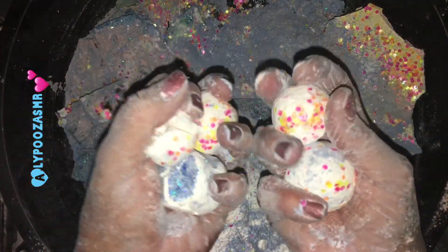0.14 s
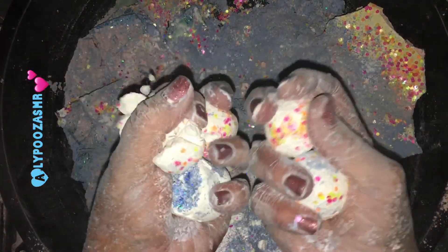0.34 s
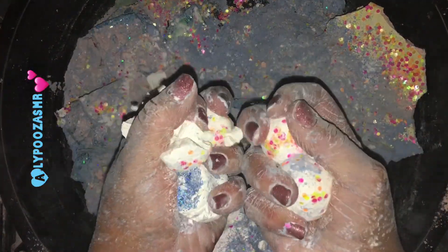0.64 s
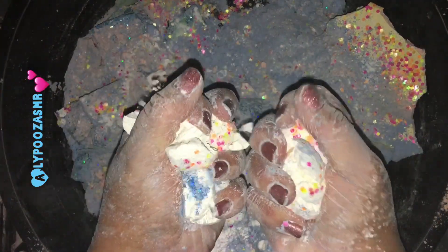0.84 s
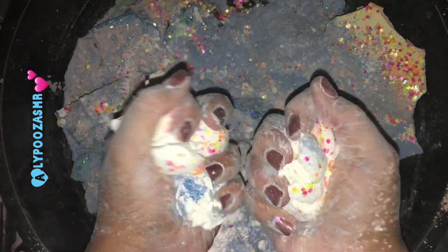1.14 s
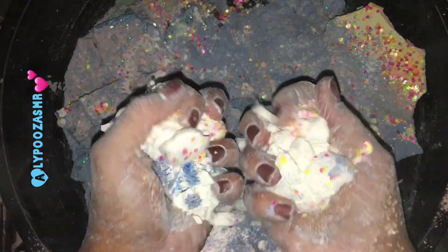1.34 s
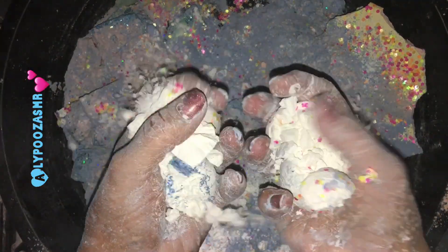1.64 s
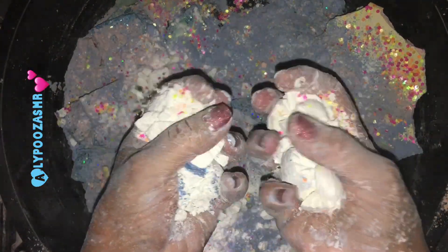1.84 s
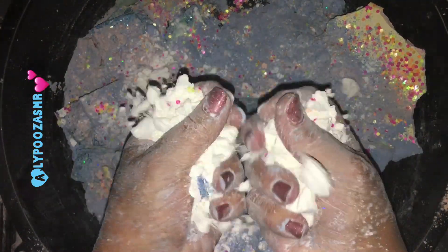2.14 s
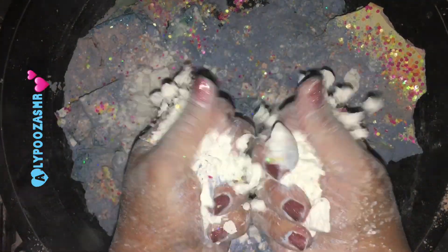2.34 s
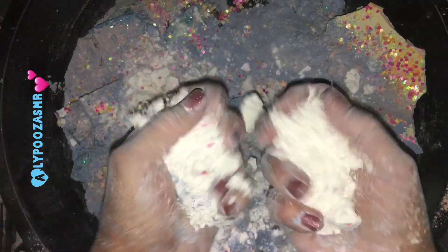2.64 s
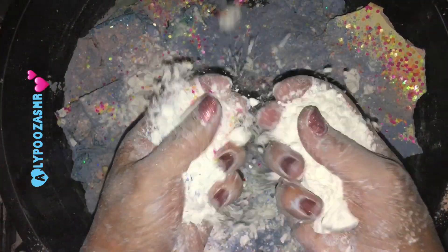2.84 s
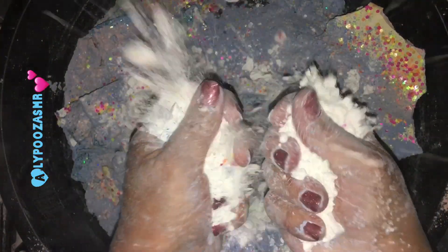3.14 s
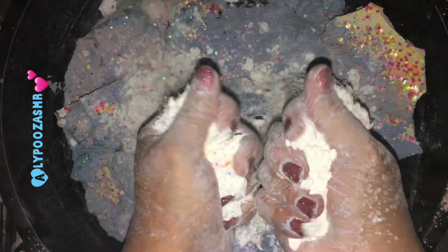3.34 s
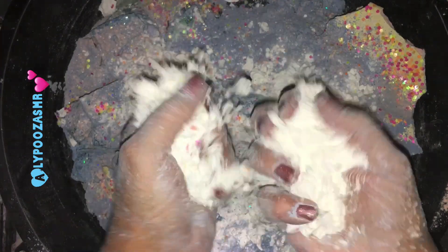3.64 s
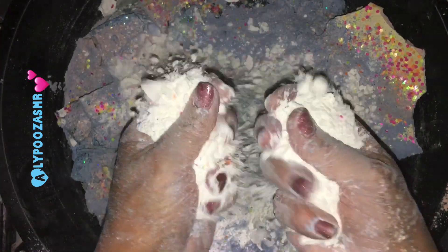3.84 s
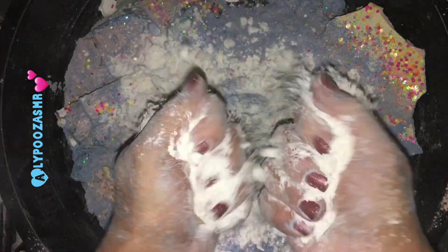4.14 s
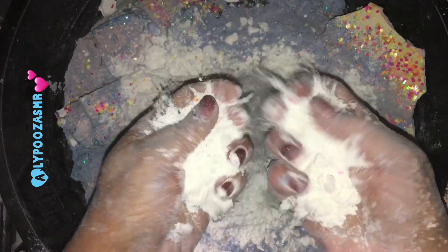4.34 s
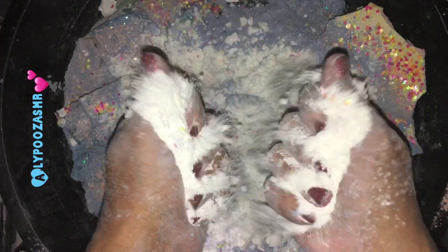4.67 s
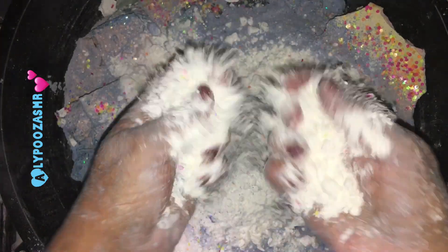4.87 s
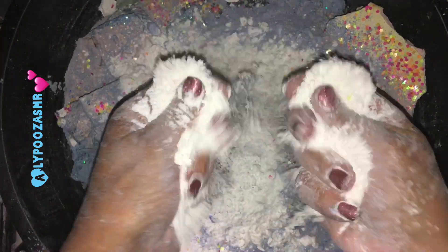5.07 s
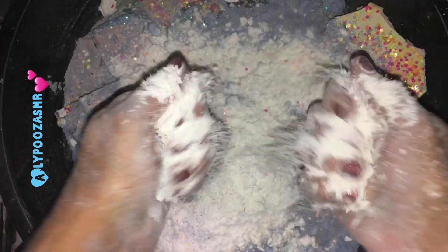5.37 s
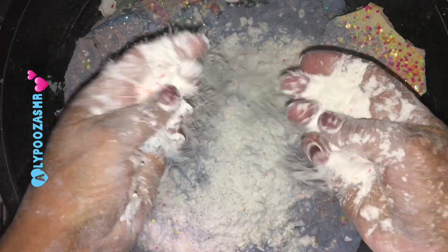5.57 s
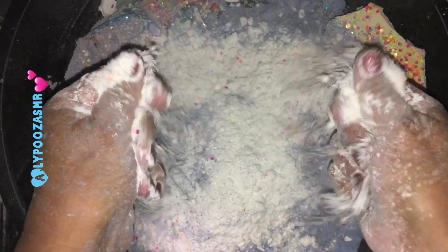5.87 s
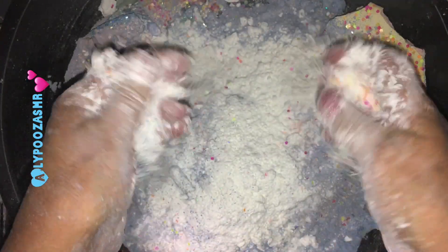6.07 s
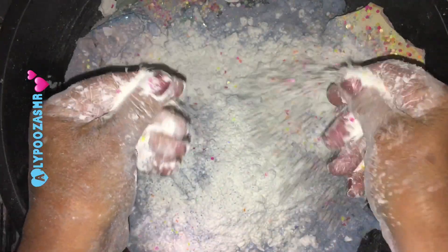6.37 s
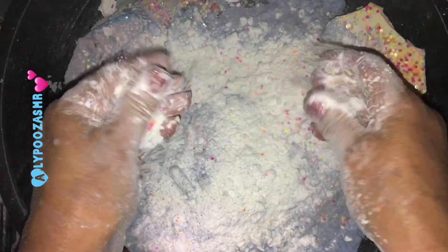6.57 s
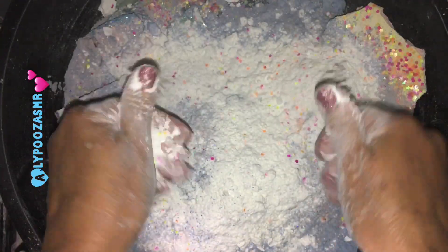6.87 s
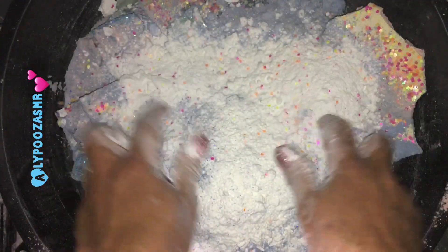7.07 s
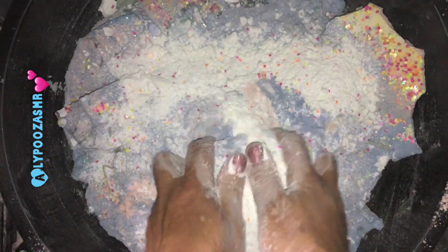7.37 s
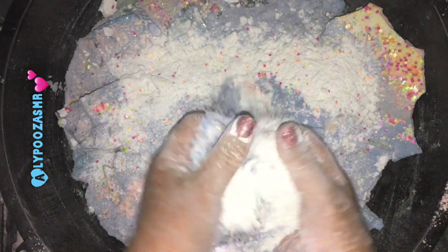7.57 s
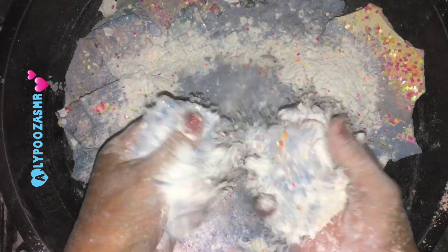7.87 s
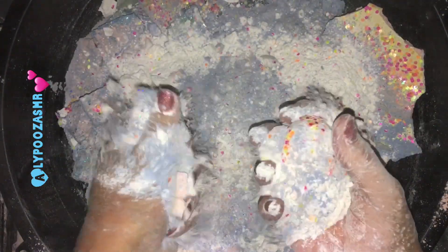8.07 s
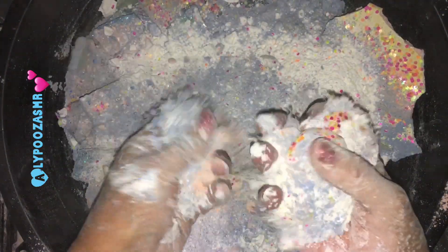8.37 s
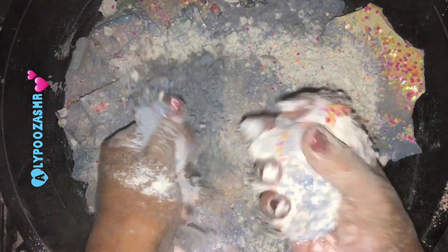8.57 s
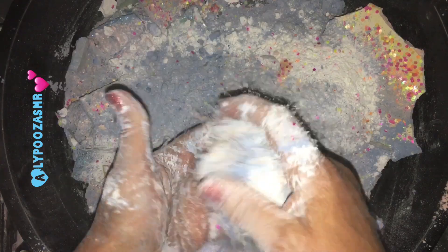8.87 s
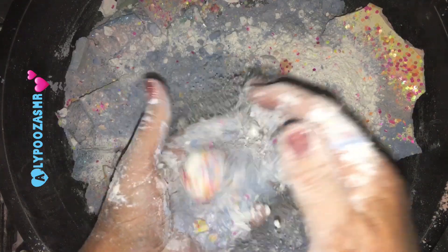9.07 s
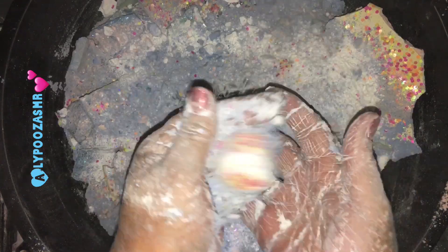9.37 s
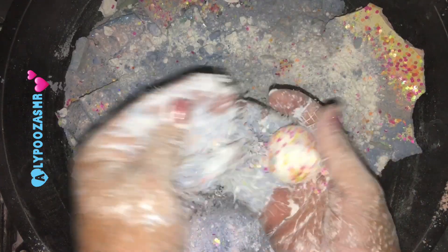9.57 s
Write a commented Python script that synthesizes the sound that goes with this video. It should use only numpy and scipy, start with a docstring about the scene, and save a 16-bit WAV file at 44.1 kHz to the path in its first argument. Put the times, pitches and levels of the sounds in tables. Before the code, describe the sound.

Very close crushing of chalk and starch pieces: crisp crunches, a hard crack near three seconds, hissing fine powder, then palms brushing through it.

```python
"""Crushing chalk and cornstarch

Two hands crush lumps over a bed of powder, close to the microphone, with a short faint room tail.
Squeezed powder hisses and grinds as coloured noise in flurries; damped resonances make the snaps and thuds.
Crusts crunch in short noise bursts, and after seven seconds the palms sweep dully through the bed.
A steady low rumble and a faint, mostly low air noise lie underneath."""
import sys
import numpy as np
from scipy import signal
from scipy.fft import rfft, irfft, next_fast_len
from scipy.io import wavfile
from scipy.ndimage import map_coordinates

SR = 44100
rng = np.random.default_rng(int(sys.argv[2]) if len(sys.argv) > 2 else 0)


def to_wav(sig):
    """Store sig (one row per channel, or 1-D mono) as 16-bit WAV at the path in sys.argv[1].

    Samples outside -1..1 are clipped; the rate is SR.
    """
    pcm = np.clip(np.atleast_2d(sig), -1, 1) * 32767
    pcm = np.round(pcm).astype(np.int16)
    wavfile.write(sys.argv[1], SR, pcm.T)  # frames by channels


N = 428191  # samples
EVENT_SIZE = int(.05 * SR)  # samples given to each snap, crunch or thud

# Background noise colours. Each row: frequency in Hz, relative level in dB per Hz.
RUMBLE_COLOUR = [(14, -20), (22, -13), (31, -16), (34, -7), (37, 0), (41, 0), (45, -7), (49, -20),
                 (60, -11), (80, -20)]
AIR_COLOUR = [(55, 6.5), (100, 3), (170, -5.5), (260, -10.5), (400, -24), (1500, -59), (12000, -43)]
RUMBLE_DB, AIR_DB = -45, -54.5
# Tail of the tub and nearby walls: decay by 60 dB in seconds, level against the direct sound in dB.
ROOM_T60_S, ROOM_DB = 0.078, -22
# Hollows of the cupped hands and the tub. Each row: frequency in Hz, width in Hz, gain in dB.
HOLLOWS = [(781, 130, -0.5), (1313, 150, 0), (2200, 74, -14.5)]

# Colours of the material at hand. Each row: frequency in Hz, relative level in dB per Hz.
PALM_COLOUR = [(90, 2), (170, 4.5), (350, -1), (550, -2.5), (780, -3), (1050, -8), (1500, -8.5),
               (2400, -16), (4000, -28)]
CRUST_COLOUR = [(400, -1.5), (1200, -7.5), (2500, 5.5), (5000, -5), (8500, 0), (10500, -8.5),
                (13000, -15.5), (16000, -28)]
CRUMB_COLOUR = [(70, -2), (130, 1), (200, 2.5), (330, -3), (550, -2.5), (780, -9), (1000, -10),
                (1400, -11.5), (2000, -11.5), (3500, -49)]
GRIT_COLOUR = [(700, -49), (1100, -1.5), (1450, -8.5), (1800, -9), (2300, -1), (3100, -0.5), (3900, -1),
               (4700, -5), (6500, -6), (10000, -34)]
POWDER_COLOUR = [(2500, -39.5), (4000, -6), (5100, -5.5), (6000, -1), (7000, -0.5), (8600, 1.5),
                 (10000, -3), (12000, -12), (14000, -19), (16000, -24)]

# Palms sweeping through the bed.
SWEEP_START_S, SWEEP_PEAK_S, SWEEP_ATTACK_S = 7.04, 7.3, 0.05
SWEEP_DB, SWEEP_RISE_DB_PER_S, SWEEP_FALL_DB_PER_S = -47, 10, 39
# Lumps landing or giving way. Each row: start in seconds, level in dB, pitch in Hz.
THUDS = [(0.5325, -35.5, 180), (0.5382, -39, 178), (0.5439, -36, 176), (1.509, -36.5, 178),
         (2.313, -44, 272), (2.668, -34, 465), (2.7323, -41.5, 157), (2.9045, -44, 173),
         (2.9513, -41.5, 477), (3.053, -40, 322), (3.2328, -24, 363), (3.2398, -25.5, 503),
         (3.2432, -21, 267), (3.2452, -27, 620), (3.283, -32, 730), (3.5826, -48.5, 360),
         (3.7845, -40.5, 221), (3.9625, -44, 187), (4.285, -41, 660), (4.9737, -46, 223), (5.741, -48, 524),
         (6.1859, -44.5, 228), (8.0521, -47, 470), (8.1155, -44, 205), (8.2122, -30.5, 235),
         (8.26, -49, 254)]
# Thud bandwidth as a share of its pitch; patter of crumbs in dB against the push, and its decay in seconds.
THUD_WIDTH, PATTER_DB, PATTER_S = 0.31, -39.5, 0.018
# Crusts collapsing. Each row: start in seconds, level in dB, centre in Hz, decay in seconds.
CRUNCHES = [(0.135, -49, 7950, 0.0021), (0.16, -48, 7610, 0.0027), (0.467, -42.5, 4800, 0.0039),
            (1.13, -37.5, 5660, 0.0056), (1.2208, -48, 8850, 0.0012), (1.365, -45.5, 8100, 0.0077),
            (1.685, -49, 7930, 0.0022), (1.904, -44.5, 6200, 0.0031), (1.996, -41, 7620, 0.0042),
            (2.008, -40, 7540, 0.0021), (2.653, -51, 5700, 0.0064), (2.909, -36, 7850, 0.0023),
            (3.0558, -31.5, 5970, 0.0028), (3.112, -44, 4130, 0.00092), (3.242, -33.5, 4270, 0.0045),
            (3.276, -40, 4220, 0.0033), (3.337, -36.5, 3900, 0.0011), (4.2448, -36.5, 6700, 0.001),
            (6.0741, -48.5, 8600, 0.00085), (7.008, -47.5, 9000, 0.0012), (8.255, -46.5, 4800, 0.0019),
            (8.763, -47, 7160, 0.00084)]
# Hard pieces snapping. Each row: start in seconds, ring level in dB, pitch in Hz, splinter tick level in dB.
CRACKS = [(0.7306, -45.5, 3450, -67), (0.9592, -54, 1890, -55), (1.4683, -47, 1800, -59),
          (1.5, -46, 1310, -61), (1.507, -40.5, 1610, -45.5), (1.55, -26.3, 1570, -34.5),
          (1.5714, -45, 1580, -49), (1.6073, -47, 1790, -65), (2.235, -48.5, 2410, -65),
          (2.314, -49, 2520, -68), (2.3821, -42, 1260, -56), (2.3996, -46.5, 1980, -61),
          (2.4299, -50, 1360, -44), (2.6681, -40, 1770, -61), (2.7544, -45.5, 2080, -50),
          (2.787, -43.5, 1480, -52), (2.8278, -39.5, 1570, -60), (2.9575, -40.5, 1280, -66),
          (3.0425, -41.5, 3140, -38), (3.2317, -26.5, 1150, -33.5), (3.238, -23, 1100, -35),
          (3.241, -23.5, 1130, -56), (3.2535, -40, 1240, -44), (3.2664, -38, 3000, -36.5),
          (3.283, -36, 1170, -43), (3.5837, -50.5, 1920, -61), (3.695, -43.5, 2280, -44),
          (3.7799, -45.5, 3300, -48), (3.7843, -34.5, 2310, -41), (4.2448, -49, 2600, -50),
          (4.7378, -48.5, 1410, -55), (4.921, -51.5, 1400, -58), (4.973, -47, 2000, -48.5),
          (5.0092, -46, 1400, -54), (6.1478, -53, 1190, -60), (6.184, -45, 2930, -49),
          (6.889, -31, 2020, -50), (6.8896, -32, 3700, -47), (6.8952, -44, 1980, -50),
          (7.0153, -51.5, 3130, -44.5), (7.0674, -48.5, 2180, -51), (7.7765, -60, 3180, -50.5),
          (8.086, -41.5, 1480, -60), (8.1149, -38.5, 2860, -72), (8.2133, -36, 830, -55),
          (9.2048, -46, 1090, -49)]
# Small chips breaking off: average rate, level and spread in dB against the grit and crumbs, pitch range.
CHIPS_PER_S, CHIP_DB, CHIP_SPREAD_DB = 4.2, -4.5, 4
CHIP_LOW_HZ, CHIP_HIGH_HZ = 1280, 3100
# Powder trickling from the hands between squeezes. Each row: time in seconds, then drive in dB
# for fine powder, coarse grit and crumbs on the bed.
TRICKLE = [(0.31, -60.5, -61.0, -69), (0.89, -52.5, -56.0, -61), (1.05, -56, -57, -64.0),
           (1.332, -52.0, -55.0, -58.5), (1.79, -55.0, -58, -59), (2.1, -46.5, -53.5, -55.0),
           (2.97, -50.5, -48.0, -50.0), (3.6, -49.5, -55.0, -54), (4.069, -49.5, -52.0, -49.0),
           (4.35, -50.5, -57, -54), (4.89, -56, -64, -58.5), (5.11, -48, -48.0, -52.0),
           (5.479, -53, -66.5, -65.0), (6.55, -52.5, -67.0, -62.5), (7.64, -61.5, -61.5, -64.5),
           (7.999, -54, -59, -56), (8.651, -51, -58.0, -60.0), (9.39, -58.5, -61.5, -63.5)]
# Fingers closing, holding and letting go. Each row: start in seconds, length in seconds, then drive in dB
# for fine powder, coarse grit and crumbs on the bed.
SQUEEZES = [(0.0, 0.044, -41, -46.5, -54.5), (0.068, 0.118, -48, -58.5, -70),
            (0.235, 0.025, -50, -60.5, -64.5), (0.354, 0.052, -50, -54.5, -67.0),
            (0.465, 0.07, -51.5, -46, -61), (0.511, 0.03, -51, -46, -41.5),
            (0.609, 0.091, -43, -44.5, -60.0), (0.762, 0.058, -51, -49.0, -60.5),
            (0.922, 0.042, -51, -46.0, -57), (1.103, 0.046, -43.0, -41.5, -55),
            (1.182, 0.093, -50.0, -56.5, -65), (1.45, 0.197, -57, -49.5, -47.0),
            (1.722, 0.04, -66, -56.5, -52), (1.824, 0.103, -52, -50.5, -64.5),
            (1.939, 0.063, -43, -46.5, -54.5), (2.157, 0.175, -50.5, -48, -48),
            (2.353, 0.093, -48.5, -52, -47.5), (2.516, 0.046, -41.5, -56.0, -56.0),
            (2.607, 0.054, -45.5, -46.5, -52.5), (2.768, 0.161, -45.5, -43, -43.0),
            (3.008, 0.064, -48, -44.5, -49.0), (3.182, 0.191, -44, -48, -47.0),
            (3.413, 0.078, -50, -49, -58.5), (3.656, 0.145, -53, -46.5, -47.0),
            (3.743, 0.144, -49.5, -46.5, -46.0), (3.885, 0.165, -49.5, -51, -51.0),
            (4.097, 0.099, -43, -52.5, -54.5), (4.397, 0.277, -51, -51, -51.5),
            (4.666, 0.104, -46, -52, -54.0), (4.784, 0.068, -47, -53.5, -62.5),
            (4.909, 0.121, -49.5, -52.5, -50.0), (5.158, 0.109, -44.5, -53.0, -49.5),
            (5.316, 0.099, -46, -55.5, -56.0), (5.495, 0.157, -51, -54, -55.5),
            (5.639, 0.194, -48.5, -50, -56.5), (5.809, 0.123, -42, -53.5, -56.5),
            (5.917, 0.128, -49.5, -64.5, -64.0), (6.135, 0.168, -45.5, -51, -58.0),
            (6.31, 0.15, -46, -58.5, -65), (6.595, 0.115, -40.5, -57, -60.0),
            (6.726, 0.061, -41.5, -57.5, -66.0), (6.797, 0.099, -48.5, -61.5, -71.5),
            (6.993, 0.084, -52, -56.5, -54), (7.148, 0.066, -60, -53, -56), (7.36, 0.081, -67, -60, -51.5),
            (7.731, 0.142, -54.5, -58.5, -53), (7.939, 0.12, -54.0, -58, -55.5),
            (8.053, 0.048, -47.5, -48.5, -40.5), (8.189, 0.08, -53, -56.5, -40),
            (8.386, 0.216, -56, -61.5, -55.5), (8.73, 0.055, -59, -59, -52.5),
            (9.045, 0.048, -68, -59.0, -52.5), (9.146, 0.042, -42, -50.0, -44.0),
            (9.547, 0.15, -46, -65.5, -68.5)]
SQUEEZE_ATTACK_S, SQUEEZE_RELEASE_S = 0.03, 0.033

CUTOFF_HZ = 15900  # top of the recorded range


def from_db(db):
    """Decibels to gain."""
    return 10 ** (np.asarray(db) / 20)


def rms_one(x):
    """Scale to an rms of 1."""
    return x / np.sqrt(np.mean(x ** 2) + 1e-20)


def add(track, s, sound):
    """Mix a sound into the track from time s on."""
    start = int(np.clip(round(s * SR), 0, N - 1))
    track[start:start + len(sound)] += sound[:N - start]


def colour(x, spectrum):
    """Give a noise a spectrum of (Hz, dB) points, with skirts falling away outside them; rms 1."""
    size = next_fast_len(len(x))
    hz, db = np.transpose(spectrum)
    bins = np.maximum(np.arange(size // 2 + 1) * SR / size, 1)
    skirt = np.minimum(bins / hz[0], 1) ** 2 * np.minimum(hz[-1] / bins, 1) ** 2
    gain = skirt * from_db(np.interp(np.log(bins), np.log(hz), db))
    return rms_one(irfft(rfft(x, size) * gain, size)[:len(x)])


def cut(x, hz, kind, order=2):
    """Butterworth low- or high-pass."""
    sos = signal.butter(order, np.clip(hz, 10, .45 * SR), kind, fs=SR, output="sos")
    return signal.sosfilt(sos, x)


def resonate(x, hz, width_hz):
    """One resonance, gain 1 on top."""
    r = np.exp(-np.pi * width_hz / SR)
    zeros = np.array([1, 0, -1]) * (1 - r * r) / 2
    poles = [1, -2 * r * np.cos(2 * np.pi * hz / SR), r * r]
    return signal.lfilter(zeros, poles, x + 1e-18)


def drift(rate):
    """Smooth random wander of rms 1, changing about rate times a second."""
    # made at a twentieth of the sample rate; the first 2000 values let the filter settle
    r = np.exp(-40 * np.pi * rate / SR)
    slow = signal.lfilter([1], [1, -2 * r, r * r], rng.standard_normal(N // 20 + 2002))[2000:]
    return np.interp(np.arange(N) / 20, np.arange(len(slow)), rms_one(slow))


def grains(size, spread_db):
    """Countless tiny fractures of very uneven strength, as noise."""
    strength = from_db(spread_db * np.clip(rng.standard_normal(size), -2, 2))
    return rng.standard_normal(size) * strength


def clicks(per_s, spread_db):
    """Lone fractures at random moments, mostly small and a few large."""
    sizes = from_db(spread_db * np.minimum(rng.exponential(1, N), 3.5))
    return sizes * (rng.random(N) < per_s / SR)


def avalanches(per_s, spread_db, decay_s):
    """Each slip sets off a flurry that starts at once and dies away; an envelope of rms 1."""
    keep = np.exp(-2 / (decay_s * SR))  # the flurries add up in power
    power = signal.lfilter([1], [1, -keep], clicks(per_s, spread_db) ** 2 + 1e-18)
    return rms_one(np.sqrt(power))


def impact(scatter, scatter_s):
    """One sharp release with a short, decaying scatter of fragments."""
    t = np.arange(EVENT_SIZE) / SR
    return (t == 0) + scatter * rng.standard_normal(EVENT_SIZE) * np.exp(-t / scatter_s)


def rumble():
    """Steady noise in the lowest octaves, strongest around 40 Hz."""
    return from_db(RUMBLE_DB) * colour(rng.standard_normal(N), RUMBLE_COLOUR)


def air():
    """Steady, faint noise that is mostly low."""
    return from_db(AIR_DB) * colour(rng.standard_normal(N), AIR_COLOUR)


def room(x):
    """A short, dulled noise tail from the tub and nearby walls, arriving 3 ms after the direct sound."""
    t = np.arange(SR // 3) / SR
    dulled = cut(rng.standard_normal(len(t)), 8600, "low", order=1)
    tail = dulled * from_db(-60 * t / ROOM_T60_S) * (t > .003)
    return signal.fftconvolve(x, tail / np.linalg.norm(tail))[:N]


def hollows(x):
    """The hollows of hands and tub ring along with whatever breaks near them."""
    return x + sum(from_db(db) * resonate(x, hz, width_hz) for hz, width_hz, db in HOLLOWS)


def between_palms(x):
    """A weak reflection off the moving palms combs the sound, so that its colour keeps shifting."""
    lag = .0006 * SR * from_db(2.2 * drift(rate=2.5))  # around 0.6 ms, in samples
    return x + .24 * map_coordinates(x, [np.arange(N) - lag], order=3)


def sweeping():
    """Flat hands push through loose powder with a dull, uneven rub that swells and fades."""
    t = np.arange(N) / SR
    touch = np.clip((t - SWEEP_START_S) / SWEEP_ATTACK_S, 0, 1)
    rise_db = SWEEP_RISE_DB_PER_S * (t - SWEEP_PEAK_S)
    fall_db = SWEEP_FALL_DB_PER_S * (SWEEP_PEAK_S - t)
    level_db = SWEEP_DB + np.minimum(rise_db, fall_db) + 1.6 * drift(rate=35)
    return touch * from_db(level_db) * colour(grains(N, spread_db=6), PALM_COLOUR)


def thuds():
    """A soft push on the powder bed makes a damped, low ring, with crumbs pattering after it."""
    out = np.zeros(N)
    for s, db, hz in THUDS:
        push = impact(scatter=from_db(PATTER_DB), scatter_s=PATTER_S)
        boom = cut(resonate(push, hz, THUD_WIDTH * hz), 7.0 * hz, "low")
        add(out, s, from_db(db) * rms_one(hollows(boom)))
    return out


def crunches():
    """A crust collapses: a dense burst of grains swells and dies within milliseconds."""
    out, t = np.zeros(N), np.arange(EVENT_SIZE) / SR
    for s, db, hz, decay_s in CRUNCHES:
        dust = colour(grains(EVENT_SIZE, spread_db=2.0), CRUST_COLOUR)
        burst = resonate(dust, hz, 0.41 * hz) + 0.52 * dust
        add(out, s, from_db(db) * rms_one(burst * np.sqrt(t) * np.exp(-t / decay_s)))
    return out


def snap(db, hz, tick_db):
    """A piece snaps: a heavily damped ring at its own pitch, and a bright tick of splinters."""
    release = impact(scatter=.045, scatter_s=.003)
    ring = resonate(release, hz, 0.42 * hz)
    ring = cut(cut(ring, hz / 2, "high", order=3), 2.0 * hz, "low", order=3)
    splinters = impact(scatter=.3, scatter_s=.0013)
    tick = cut(resonate(splinters, 6360, 3900), 11000, "low", order=3)
    return from_db(db) * rms_one(hollows(ring)) + from_db(tick_db) * rms_one(tick)


def cracks():
    """The large pieces snap one by one."""
    out = np.zeros(N)
    for s, db, hz, tick_db in CRACKS:
        add(out, s, snap(db, hz, tick_db))
    return out


def chips(grinding):
    """Small pieces snap at random, more often and louder where more is being ground."""
    out = np.zeros(N)
    ground = np.cumsum(grinding) / np.sum(grinding)  # share of the grinding done so far
    for when, size, pitch in rng.random((int(CHIPS_PER_S * N / SR), 3)):
        i = np.searchsorted(ground, when)
        db = CHIP_DB + CHIP_SPREAD_DB * (2 * size - 1)
        hz = CHIP_LOW_HZ * (CHIP_HIGH_HZ / CHIP_LOW_HZ) ** pitch
        add(out, i / SR, grinding[i] * snap(db, hz, tick_db=db - 1))
    return out


def pressure(start, length):
    """One squeeze: the fingers close quickly, hold, and the flow dies away once they stop."""
    t = np.arange(int((length + 6 * SQUEEZE_RELEASE_S) * SR)) / SR
    closing = np.minimum(t / SQUEEZE_ATTACK_S, 1)
    return closing * np.exp(-np.maximum(t - length, 0) / SQUEEZE_RELEASE_S)


def flows():
    """Drive of powder, grit and crumbs: a continuous trickle, with every squeeze added in power."""
    s, *trickles = np.transpose(TRICKLE)
    power = [from_db(np.interp(np.arange(N) / SR, s, db)) ** 2 for db in trickles]
    for start, length, *levels in SQUEEZES:
        for track, db in zip(power, levels):
            add(track, start, (from_db(db) * pressure(start, length)) ** 2)
    return np.sqrt(power)


def crackle(low_hz, high_hz, per_s):
    """Single crumbs of eight sizes pop, each size with its own short damped ring."""
    pops = 0
    for hz in np.geomspace(low_hz, high_hz, num=8):
        breaks = clicks(per_s, spread_db=3.8)
        ring = resonate(resonate(breaks, hz, 0.23 * hz), hz, 1.2 * hz)
        pops = pops + ring / np.sqrt(hz)
    return rms_one(pops)


def squeezing(powder, grit, crumbs):
    """Powder, grit and crumbs flow under the fingers; their sticking and slipping stirs all three."""
    grip_db = drift(rate=30.7)
    slips = avalanches(per_s=180, spread_db=6.0, decay_s=0.0044)
    grinds = avalanches(per_s=170, spread_db=3.0, decay_s=0.00081)
    falls = avalanches(per_s=180, spread_db=6.0, decay_s=0.0022)
    flurries = np.sqrt(slips ** 2 + grinds ** 2 + falls ** 2)
    # each size of grain flows steadily in part and in flurries for the rest
    fine_flow = np.hypot(from_db(-2.83), from_db(-6.5) * slips)
    coarse_flow = np.hypot(from_db(-4.0), from_db(-7.0) * flurries)
    dull_flow = np.hypot(from_db(-3.0), from_db(0.5) * falls)
    fine = colour(grains(N, spread_db=7), POWDER_COLOUR) * fine_flow
    coarse = colour(grains(N, spread_db=7), GRIT_COLOUR) * coarse_flow
    dull = rms_one(hollows(colour(grains(N, spread_db=6), CRUMB_COLOUR))) * dull_flow
    # single breaks stand out of the flow: ringing pops, bright specks and dry ticks
    pops = from_db(-11.5) * np.sqrt(grit * crumbs) * crackle(830, 3600, per_s=28)
    specks = from_db(-15.5) * powder * crackle(3800, 7000, per_s=58)
    dry_ticks = colour(clicks(per_s=140, spread_db=4.8), CRUST_COLOUR)
    ticks = from_db(-8.5) * np.sqrt(powder * grit) * dry_ticks
    in_hands = between_palms(powder * fine + grit * coarse + pops + specks + ticks)
    on_bed = crumbs * dull
    return (in_hands + on_bed) * from_db(grip_db)


def scene():
    """The chalk close by with its room tail, over a steady low rumble and faint air; one channel."""
    powder, grit, crumbs = flows()
    chalk = sweeping() + thuds() + crunches() + cracks()
    chalk = chalk + chips(np.sqrt(grit * crumbs)) + squeezing(powder, grit, crumbs)
    return (rumble() + air() + from_db(ROOM_DB) * room(chalk) + chalk)[None]


def record(dry):
    """The loudest peaks are rounded off, and the top is cut steeply."""
    rounded = dry / (1 + (dry / .88) ** 4) ** .25
    steep = signal.ellip(10, .2, 80, CUTOFF_HZ, fs=SR, output="sos")
    return signal.sosfilt(steep, rounded)


dry = scene()
out = record(dry)
to_wav(out)
```